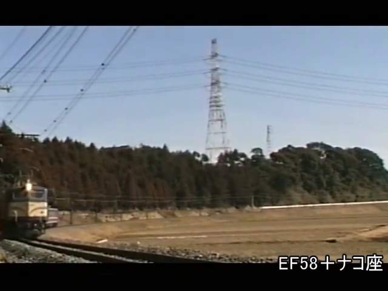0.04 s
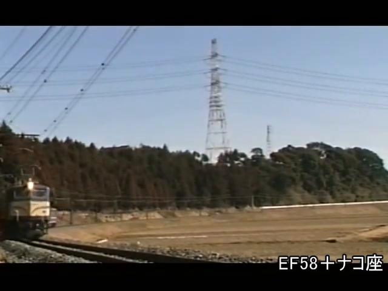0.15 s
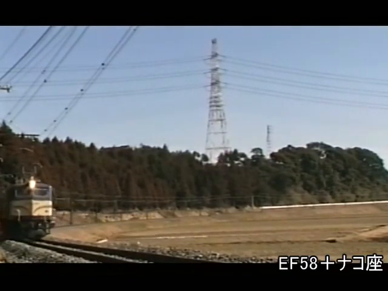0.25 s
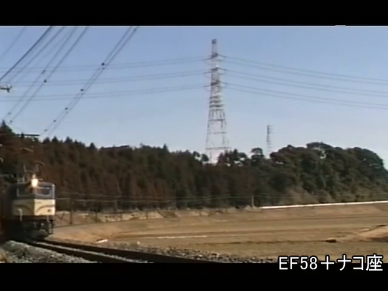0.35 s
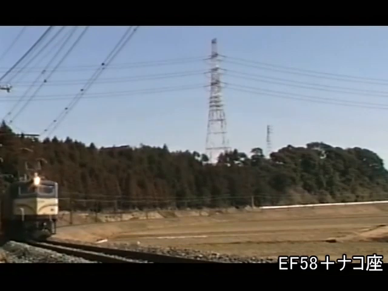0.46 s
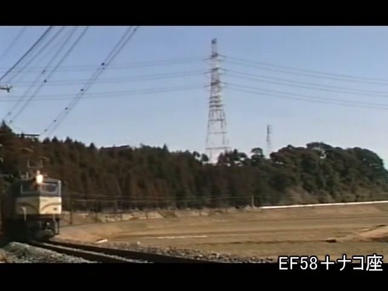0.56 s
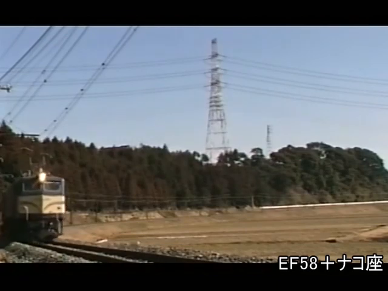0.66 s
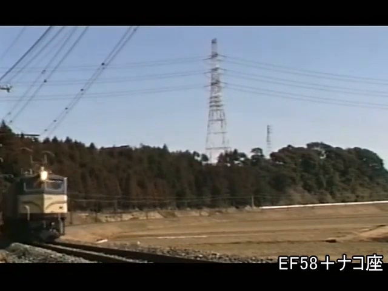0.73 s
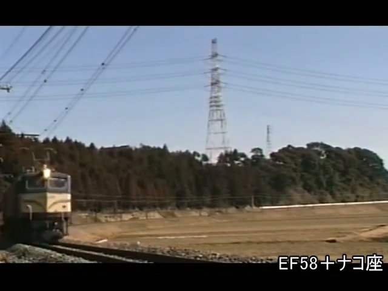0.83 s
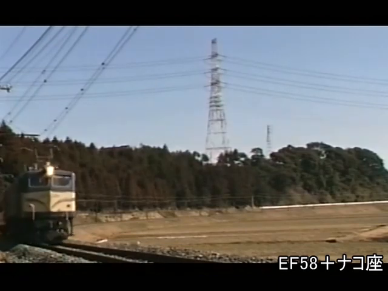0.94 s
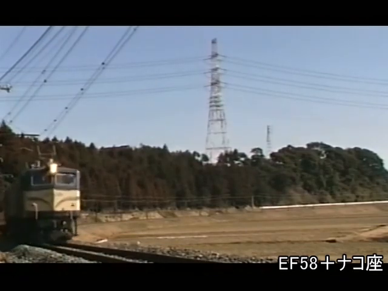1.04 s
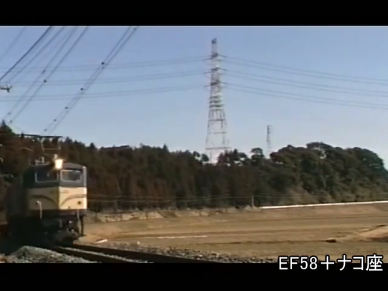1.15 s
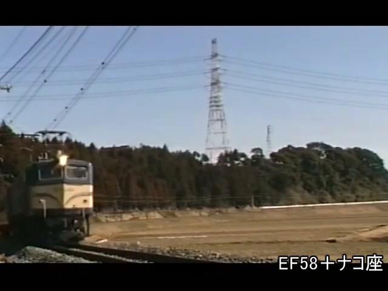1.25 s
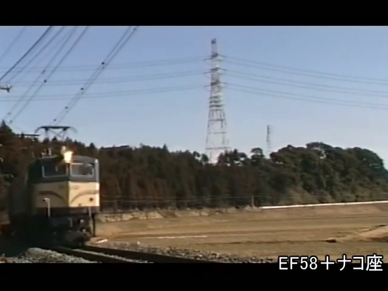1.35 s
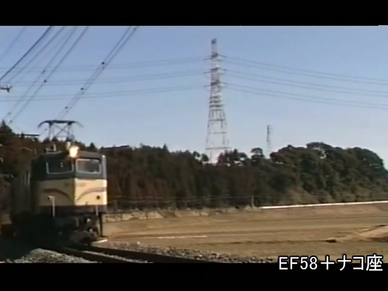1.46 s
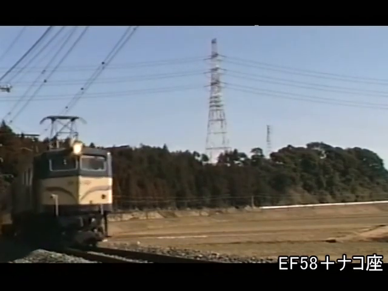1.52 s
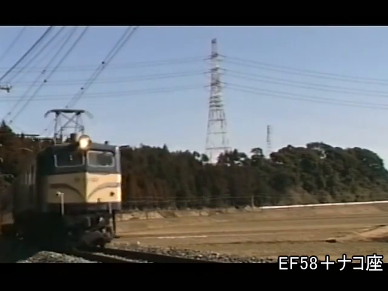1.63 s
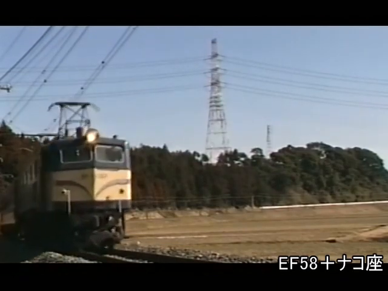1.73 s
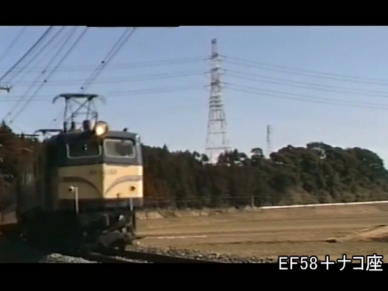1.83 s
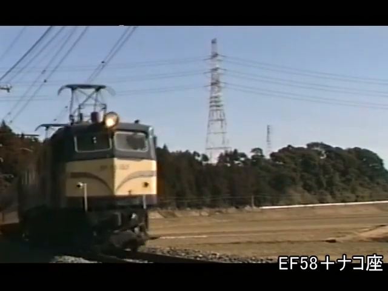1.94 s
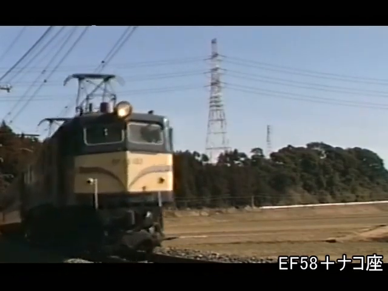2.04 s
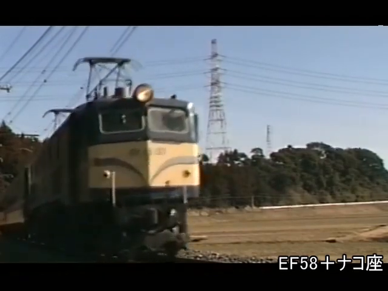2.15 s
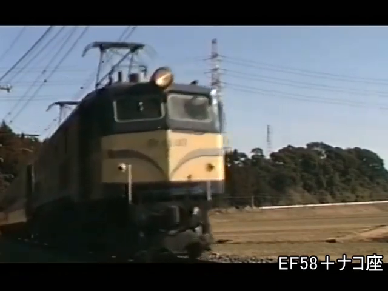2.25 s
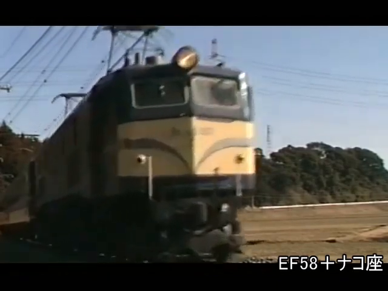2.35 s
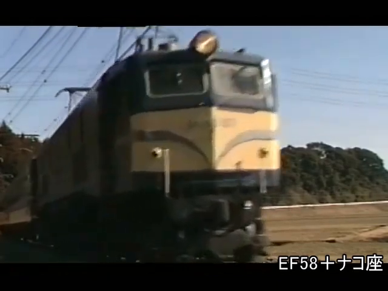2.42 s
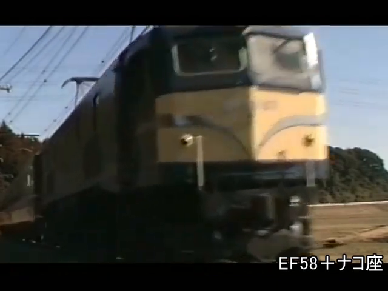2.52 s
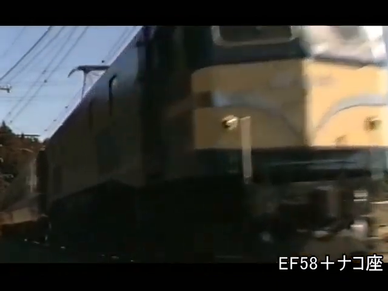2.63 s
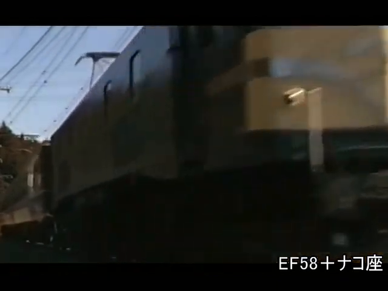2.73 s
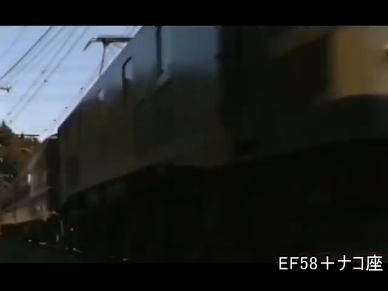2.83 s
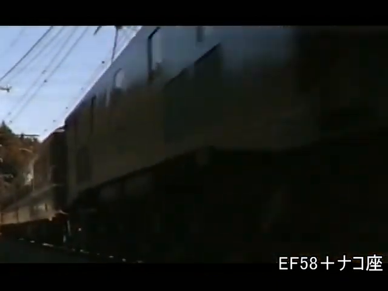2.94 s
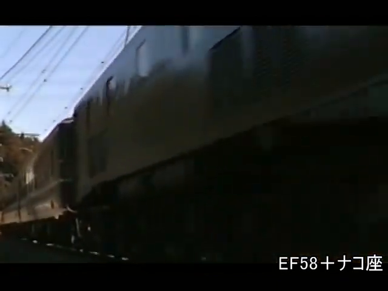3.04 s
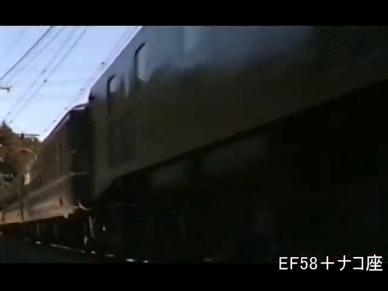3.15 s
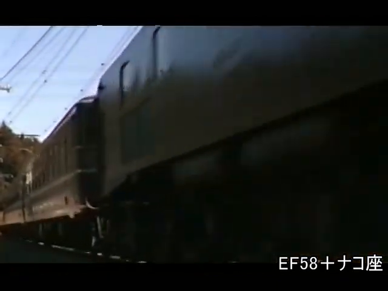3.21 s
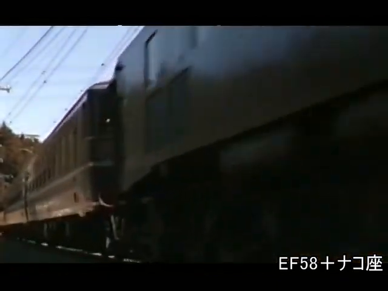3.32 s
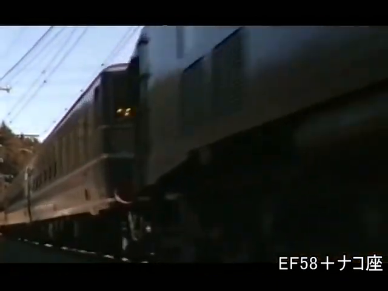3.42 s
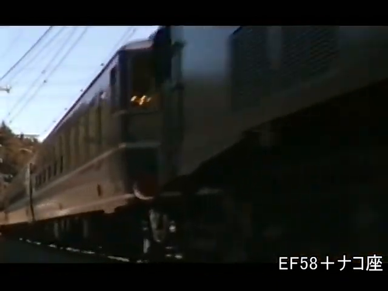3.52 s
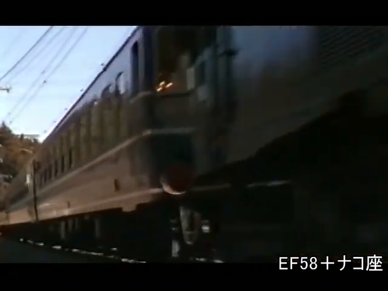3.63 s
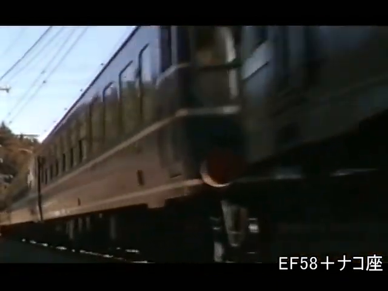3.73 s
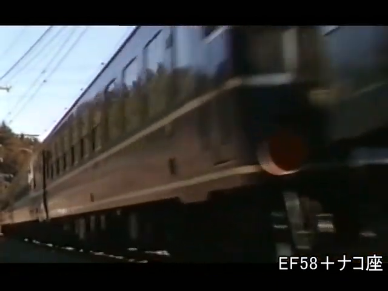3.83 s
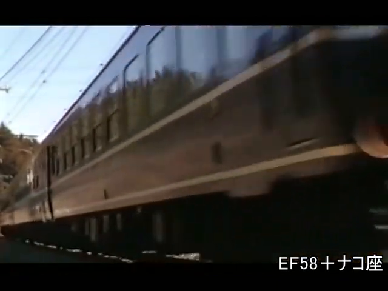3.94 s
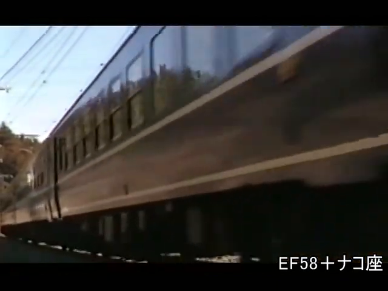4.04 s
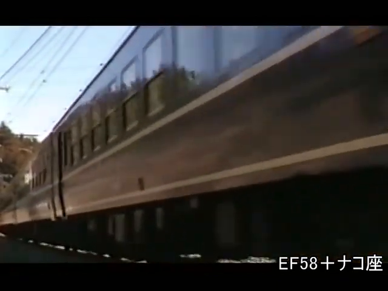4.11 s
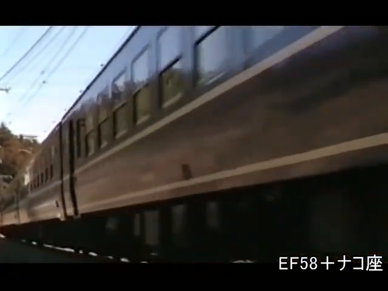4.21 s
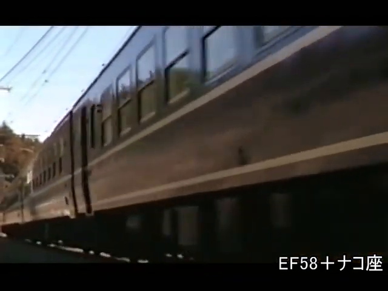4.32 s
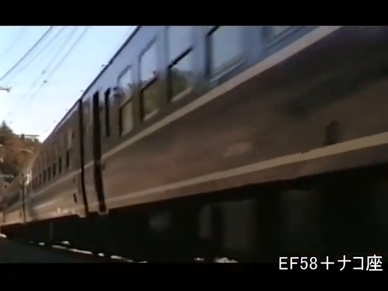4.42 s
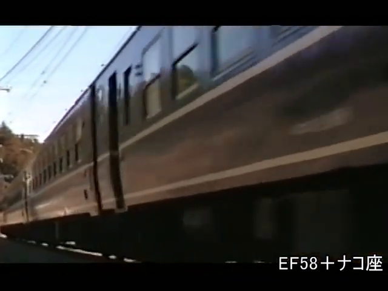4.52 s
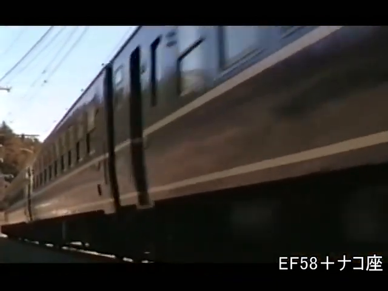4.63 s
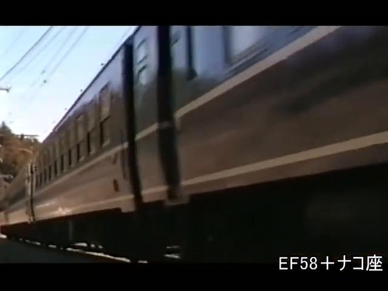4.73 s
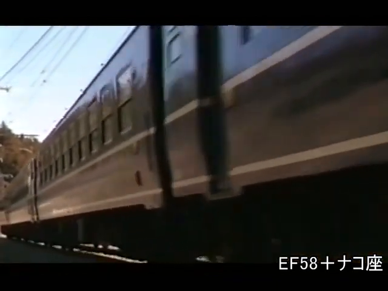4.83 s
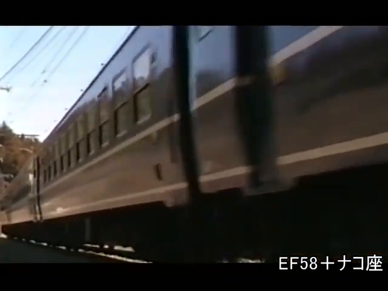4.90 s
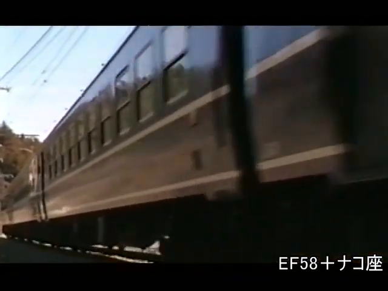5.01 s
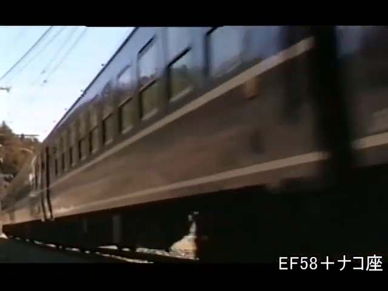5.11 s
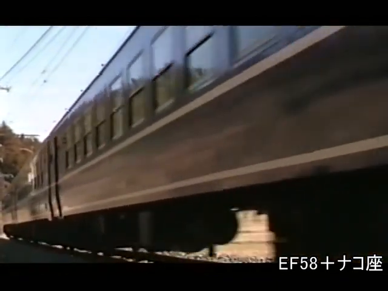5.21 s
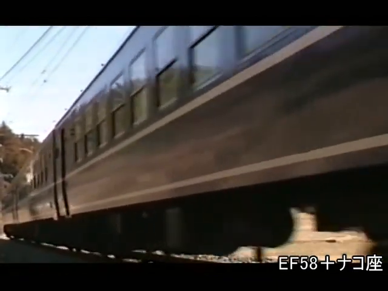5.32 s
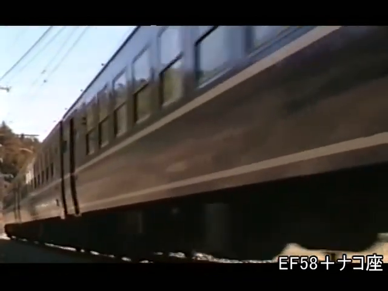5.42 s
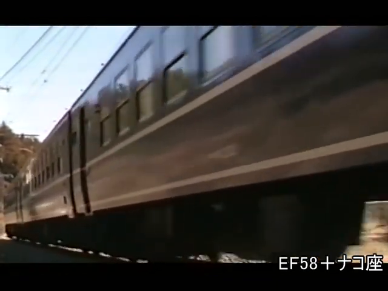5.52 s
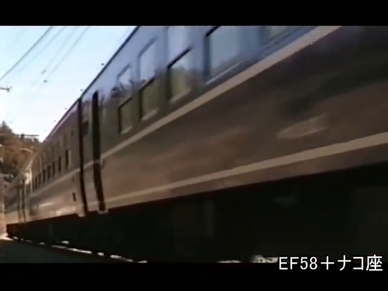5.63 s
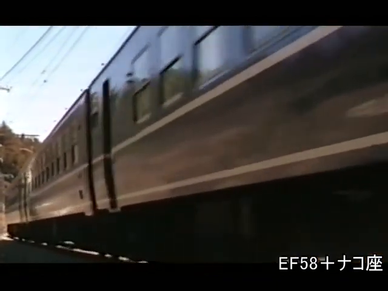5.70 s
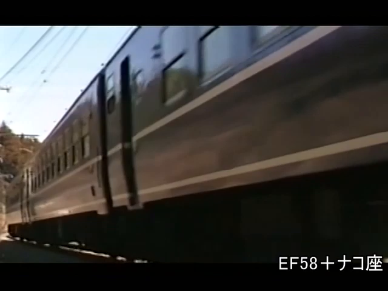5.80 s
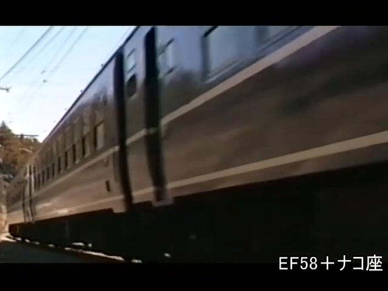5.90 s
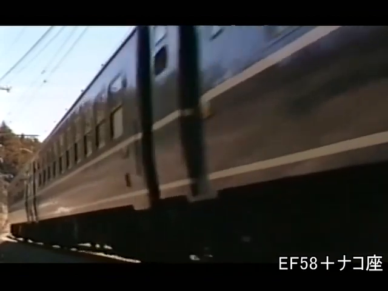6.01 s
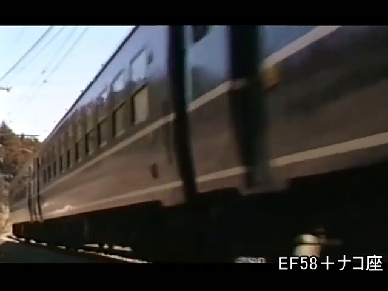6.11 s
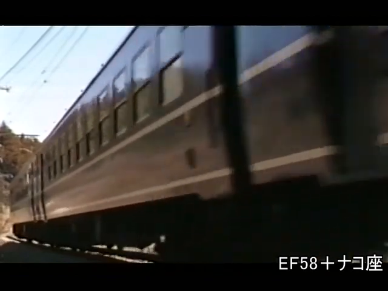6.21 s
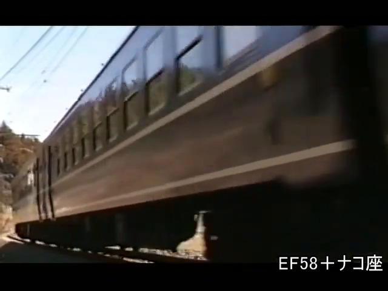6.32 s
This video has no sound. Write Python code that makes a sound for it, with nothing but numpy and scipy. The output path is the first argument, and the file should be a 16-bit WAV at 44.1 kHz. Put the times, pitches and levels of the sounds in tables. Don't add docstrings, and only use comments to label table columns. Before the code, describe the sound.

A small stereo microphone beside a curved country track picks up a train approaching: low ground rumble, soft hiss, gear whine and early clacks. Heavier blows arrive, then a broad roar peaks as the locomotive passes. It eases into steadier coach rolling, broken by dull axle knocks, bright joint clatter, ringing rims and short high flange squeals, still passing at the end.

```python
import sys
import numpy as np
from scipy import signal
from scipy.fft import rfft, irfft, next_fast_len
from scipy.io import wavfile
from scipy.ndimage import uniform_filter1d, map_coordinates

SR = 44100
rng = np.random.default_rng(int(sys.argv[2]) if len(sys.argv) > 2 else 0)


def ratio_of_db(decibels):
    return 10 ** (np.asarray(decibels, float) / 20)


def wrap_up_sound(samples):
    columns = np.atleast_2d(samples).T
    tamed = np.clip(columns, -1, 1)
    steps = np.round(tamed * 32767).astype(np.int16)
    wavfile.write(sys.argv[1], SR, steps)


N = 280476
T = np.arange(N) / SR
HZ = np.fft.rfftfreq(next_fast_len(N), 1 / SR) + 1e-3

# middle in seconds, length in seconds, heave in dB, flutter in dB.
GUSTS = [
    (0.31, 0.46, -69, -37),
    (3.667, .45, -47, -62),
    (5.5, 0.36, -66, -60),
    (6.09, 0.39, -57, -32.5),
]
# time in seconds, level in dB.
GROUND_LOAD = [(0, -56), (.3, -51.5), (1.5, -45), (2.1, -47.5), (2.6, -42), (3.3, -59), (4.05, -65),
               (4.4, -45), (5.1, -54), (5.75, -43), (6.36, -52)]
# start in seconds, level in dB, pitch in Hz.
KNOCKS = [(1.578, -36, 334), (1.708, -38, 392), (1.997, -30.5, 385), (2.469, -31, 323), (2.809, -24, 374),
          (3.249, -21, 385), (3.636, -24, 365), (3.688, -28, 340), (4.237, -34, 310), (4.299, -35, 191),
          (4.431, -27, 280), (4.549, -26, 258), (5.24, -27, 265), (5.356, -26.5, 271), (5.493, -24, 170),
          (5.609, -23, 255), (5.641, -29, 254), (5.752, -25.5, 236), (6.008, -26, 300), (6.319, -25, 285)]
# middle in seconds, length in seconds, pitch in Hz, level in dB.
SONGS = [(1.05, .1, 1290, -45), (1.47, .26, 1180, -45), (1.66, .12, 1150, -43), (1.48, .12, 345, -47),
         (2.1, .14, 1190, -40), (4.43, .1, 2620, -35), (4.58, .1, 1980, -37), (5.03, .04, 3200, -36),
         (5.03, .05, 2480, -36), (5.1, .08, 3150, -37), (5.125, .07, 2450, -28), (5.135, .06, 4680, -32),
         (5.21, .05, 4670, -37), (5.39, .22, 3340, -35), (5.42, .12, 2020, -33), (5.45, .14, 2540, -34),
         (5.455, .04, 460, -32), (5.5, .05, 1160, -30), (5.54, .04, 800, -28), (5.52, .08, 3820, -38),
         (5.6, .05, 1160, -27), (5.61, .04, 790, -28), (5.62, .1, 4660, -32), (5.64, .08, 3860, -36),
         (5.58, .05, 2570, -33), (5.65, .1, 2420, -33), (5.69, .06, 3070, -37), (6.25, .1, 1850, -31),
         (6.28, .1, 2500, -35)]
# start in seconds, level in dB, pitch in Hz.
PINGS = [(0.945, -21.5, 1094), (2.286, -14, 900), (2.386, -18, 935), (2.439, -18.5, 1050),
         (2.488, -17, 1215), (4.694, -16.5, 1060), (4.899, -20.5, 753), (4.98, -14, 848),
         (5.795, -17.5, 810), (5.894, -22.5, 703), (5.978, -26.5, 852), (6.189, -15.5, 854)]
# centre in Hz, width in Hz, level in dB.
GEAR_MODES = [(330, 20, -9), (374.6, 49, -11), (710, 11, -23), (1192.4, 39, 1), (1845, 46, -3),
              (1970, 24, -0.5)]
# centre in Hz, width in Hz, level in dB.
RIM_MODES = [(484, 42, -5.5), (822, 120, 1), (1169, 76, -1), (1904, 160, 0.5), (2480, 54, -4.5),
             (3300, 98, -7), (4070, 190, -5.5), (4650, 200, -7.5), (5260, 130, -8)]
# start in seconds, blow in dB, clank in Hz,
# thud over the blow in dB, tick over the blow in dB.
LOCO_JOINTS = [(1.0204, -24, 895, -9, -42), (1.12, -25.5, 1294, -13.5, -39),
               (1.2222, -31.5, 1077, -10, -37), (1.318, -43, 1240, -11, -32),
               (2.3083, -13, 1260, -7.5, -39), (2.4096, -16.5, 1150, -11, -44),
               (2.514, -15.5, 1160, -15, -33), (2.603, -22.5, 1048, -10.5, -24),
               (2.661, -34, 1160, -3, -20), (2.747, -24, 1264, -8, -27), (2.8589, -28.5, 1100, 5, -18)]
# start in seconds, blow in dB, clank in Hz,
# thud over the blow in dB, tick over the blow in dB.
COACH_JOINTS = [(4.1056, -31, 1140, -7, -15), (4.3664, -29.5, 786, -13, -12.5),
                (4.4661, -24, 710, -6.5, -17), (4.568, -24, 882, -13, -9), (4.6694, -21, 1104, -7.5, -12.5),
                (4.6974, -23, 1044, -13, -21), (4.8589, -17.5, 888, -19, -14),
                (4.9356, -26, 1306, -31, -27), (4.95, -22.5, 1355, -16, -23),
                (4.9706, -19.5, 836, -16.5, -13.5), (5.5764, -16.5, 1190, -21, -24),
                (5.667, -21, 802, -18, -15), (5.7808, -22, 820, -12, -11), (5.862, -30.5, 890, -15, -7),
                (5.8832, -19.5, 666, -8, -32), (5.974, -28, 866, -21, -9.5),
                (6.0661, -16.5, 716, -13.5, -13.5), (6.1294, -27, 1190, -28, -19),
                (6.18, -20, 862, -12.5, -11.5), (6.3394, -33.5, 856, -1, -8)]
# time in seconds, roar in dB, wheel discs over rail in dB,
# flange rub on the curve in dB.
ROLL = [(0.0, -47.5, -2.5, -1), (0.8, -43.5, -1, -0.5), (1.1, -42.5, 4, 4.5), (1.45, -41, 2.5, 1),
        (1.8, -37.5, 4, 2), (2.26, -34.5, 1.5, 2), (2.45, -26, -4, -3.5), (2.85, -19, -3, 0),
        (3.1, -22.5, 3, 1.5), (3.58, -28.5, 8.5, 5), (3.9, -27, 4, 0), (4.2, -30, 0, -5),
        (4.66, -28.5, -3, -6), (5.05, -32, 4, 1.5), (5.5, -26.5, 0.5, 4), (5.83, -27.5, -2, -2),
        (6.06, -28.5, 1, 2.5), (6.36, -31.5, 3.5, 5)]
# frequency in Hz, density in dB per Hz.
LOCO_SPECTRUM = [(24, -50), (40, -21), (122, -10), (375, 3.5), (411, -5), (519, 0), (687, 2.5), (952, 0.5),
                 (1170, 3.5), (2010, 5), (2530, -3.5), (5100, -10.5), (9790, -31), (10500, -43),
                 (13600, -74), (22000, -120)]
# frequency in Hz, density in dB per Hz.
COACH_SPECTRUM = [(24, -53), (40, -22), (80, -49), (125, -6.5), (270, -3), (570, 4.5), (1170, 5), (1520, 5),
                  (1960, 5), (4750, -5), (6290, -8.5), (10500, -30.5), (13600, -71), (22000, -120)]
PART_EDGES_HZ = [150, 500, 1400, 3000, 10000]
# level over the roar in dB under the locomotive, the same under the coaches,
# share of disc level (0-1), share of rub level (0-1).
PARTS = [
    (-9.5, -5, .01, .01),
    (-0.7, -5, 0.0033, .01),
    (0.87, -1.2, .99, .01),
    (-3, -3, .01, 0.96),
]
# frequency in Hz, shared power (0-1).
LIKENESS = [(100, 0.99), (300, 0.86), (1000, 0.75), (1800, 0.61), (3300, 0.6), (6000, 0.29), (10000, 0.02)]

HISS_DB = -66
DRAUGHT_DB, DRAUGHT_FLUTTER_DB = -39, -36.5
DRAUGHT_SHARE = 0.54
SHAKE_DB, SHAKE_T60_S = -20, 0.2
LOCO_DEEP_DB, COACH_DEEP_DB = -46, -37
SONG_DB, SONG_THROB_DB = 3, 3
PING_TICK_DB, PING_RATTLE_DB = -29.5, -8.5
GEARS_DB, GEARS_FAR_DB = -10, -12
GEARS_FROM_S, GEARS_TO_S, GEARS_FADE_S = 0.66, 4.1, 0.067
RIMS_DB, RIMS_FAR_DB, RIMS_FROM_S, RIMS_FADE_S = -8.5, -25, 4.69, 0.1
RUB_SINGS = 1.8
TICK_T60_S, TICK_HZ, TICK_WIDTH_HZ = 0.025, 8000, 5000
SKEW_S, SKEW_DB = 0.0053, -10
CLATTER_TOP_HZ = 6800
COUPLING_S, HANDOVER_S = 4.32, 0.31
ABEAM_S, SWING_S = 2.96, 0.2
PAN_AHEAD_DB, PAN_BEHIND_DB = 0, -8
LAG_AHEAD_SAMPLES, LAG_BEHIND_SAMPLES = -0.72, 3.15


def columns(table):
    s, *cols = np.transpose(table)
    return [np.interp(T, s, c) for c in cols]


def on_log(hz, table):
    f, v = np.transpose(table)
    return np.interp(np.log(hz), np.log(f), v)


def after(s, fade_s):
    return 1 / (1 + np.exp(-(T - s) / fade_s))


def walk(rate_hz):
    knots = rng.standard_normal(200)
    place = T * rate_hz
    k = place.astype(int)
    ease = (1 - np.cos(np.pi * (place - k))) / 2
    return knots[k] + ease * (knots[k + 1] - knots[k])


def shape(x, gain):
    return irfft(rfft(x, next_fast_len(N)) * gain, next_fast_len(N))[..., :N]


def peak(hz, width_hz):
    return 1 / (1 + 1j * (HZ - hz ** 2 / HZ) / width_hz)


def noise(gain, channels=3):
    used = np.abs(gain) > 1e-3 * np.abs(gain).max()
    lines = np.zeros((channels, len(HZ)), complex)
    lines[:, used] = rng.standard_normal((channels, len(HZ), 2))[:, used] @ [1, 1j] * gain[used]
    x = irfft(lines, next_fast_len(N))[:, :N]
    return x / x.std()


def blow(rise_s, t60_s, abrupt=1.34):
    age_s = T[:SR // 4]
    form = (1 - np.exp(-age_s / rise_s)) ** 2 * ratio_of_db(-60 * (age_s / t60_s) ** abrupt)
    return age_s, form / form.max()


def bursts(s, db, rise_s, t60_s):
    kicks = np.zeros(N)
    at = np.clip(((s - rise_s) * SR).astype(int), 0, N - 1)
    np.add.at(kicks, at, ratio_of_db(db))
    return signal.oaconvolve(kicks, blow(rise_s, t60_s)[1])[:N]


def rings(s, db, hz, rise_s, t60_s, partner=1.1, partner_db=-4):
    out = np.zeros(N + SR)
    age_s, form = blow(rise_s, t60_s)
    for start_s, level_db, f, turn in zip(s - rise_s, db, hz, rng.random((len(s), 2))):
        pair = np.sin(2 * np.pi * (f * age_s + turn[0]))
        pair += ratio_of_db(partner_db) * np.sin(2 * np.pi * (partner * f * age_s + turn[1]))
        at = int(start_s * SR)
        out[at:at + len(age_s)] += ratio_of_db(level_db) * form * pair
    return out[:N]


def hiss():
    return ratio_of_db(HISS_DB) * noise(peak(8000, 9000), channels=2)


def wind():
    drag_db = DRAUGHT_SHARE * columns(ROLL)[0]
    heave_size = ratio_of_db(DRAUGHT_DB + drag_db + 3.1 * walk(9))
    flutter_size = ratio_of_db(DRAUGHT_FLUTTER_DB + drag_db)
    for s, length_s, heave_db, flutter_db in GUSTS:
        swell = np.exp(-(2 * (T - s) / length_s) ** 4)
        heave_size = heave_size + ratio_of_db(heave_db) * swell
        flutter_size = flutter_size + ratio_of_db(flutter_db) * swell
    heave = heave_size * ratio_of_db(-0.5) * noise(peak(31, 25) ** 2)
    flutter = flutter_size * ratio_of_db(3.2 * walk(25)) * noise(peak(159, 170) ** 2)
    left = ratio_of_db(8.5) * heave[0] + ratio_of_db(2.0) * flutter[0]
    right = -ratio_of_db(2.0) * heave[0] - ratio_of_db(-2.5) * flutter[0]
    return np.array([left, right]) + 0.27 * heave[1:] + 0.14 * flutter[1:]


def ground():
    s, db, _, thud_db, _ = np.transpose(LOCO_JOINTS + COACH_JOINTS)
    load = ratio_of_db(columns(GROUND_LOAD)[0] + 5.1 * walk(11.0) - 7.0)
    load = load + bursts(s, db + thud_db + SHAKE_DB, 0.0054, SHAKE_T60_S)
    return load * noise(peak(99, 81) ** 2, channels=1)


def knocks():
    s, db, hz = np.transpose(KNOCKS)
    deep_db = np.where(s < GEARS_TO_S, LOCO_DEEP_DB, COACH_DEEP_DB)
    note = rings(s, db, hz, 0.0035, 0.063, partner=0.663, partner_db=-10.5)
    return note + rings(s, deep_db, 0.69 * hz, 0.013, 0.054)


def songs():
    out = np.zeros(N)
    waver_s = np.cumsum(1 + 0.011 * walk(28)) / SR
    throb = walk(30)
    for (s, length_s, hz, db), shift in zip(SONGS, rng.integers(0, N - SR, 64)):
        at = np.arange(int((s - length_s) * SR), min(int((s + length_s) * SR), N))
        own = at - at[0] + shift
        swell = np.exp(-(2 * (T[at] - s) / length_s) ** 4)
        level = ratio_of_db(db + SONG_DB + SONG_THROB_DB * throb[own])
        out[at] += level * swell * np.sin(2 * np.pi * hz * waver_s[own])
    return out


def pings():
    s, db, hz = np.transpose(PINGS)
    tick = bursts(s - 0.009, db + PING_TICK_DB, 0.0017, 0.034)
    out = tick * noise(peak(TICK_HZ, TICK_WIDTH_HZ) ** 2)
    rattle = bursts(s, db + PING_RATTLE_DB, 0.0067, 0.076)
    out += rattle * noise(peak(1090, 1300) ** 2)
    out[0] += rings(s, db, hz, 0.00204, 0.042, partner=1.15, partner_db=-29.5)
    return out


def ringing():
    roar_db, _, rub_db = columns(ROLL)
    gears_near = after(GEARS_FROM_S, GEARS_FADE_S) - after(GEARS_TO_S, GEARS_FADE_S)
    gears_db = GEARS_DB + GEARS_FAR_DB * (1 - gears_near)
    rims_near = after(RIMS_FROM_S, RIMS_FADE_S)
    rims_db = RIMS_DB - 2.5 + RUB_SINGS * rub_db + RIMS_FAR_DB * (1 - rims_near)
    out = 0
    for modes, db, patchy_db in ((GEAR_MODES, gears_db, 4.0), (RIM_MODES, rims_db, 5.0)):
        for hz, width_hz, mode_db in modes:
            level = ratio_of_db(roar_db + db + mode_db + patchy_db * walk(15))
            out = out + level * noise(peak(hz, 2 * width_hz) ** 2)
    return out


def joints(table, lag_s, body_hz, clatter_db, ring_db, clank_t60_s, clatter_t60_s, thud_t60_s):
    s, clank_db, hz, thud_db, tick_db = np.transpose(table)
    tick_db, clatter_db, thud_db = clank_db + tick_db, clank_db + clatter_db, clank_db + thud_db
    drop_s = s + lag_s

    tick = bursts(s, tick_db, 0.0015, TICK_T60_S)
    tick = tick + bursts(s + SKEW_S, tick_db + SKEW_DB, 0.001, TICK_T60_S)
    tick = tick * noise(peak(TICK_HZ, TICK_WIDTH_HZ) ** 2)

    top_cut = CLATTER_TOP_HZ ** 3 / np.hypot(CLATTER_TOP_HZ ** 3, HZ * HZ * HZ)
    clatter = bursts(s + lag_s / 2, clatter_db - 2.5, 0.0057, clatter_t60_s)
    clatter = clatter * noise(peak(1400, 3300) * peak(3360, 5300) * top_cut)

    clank = bursts(drop_s, clank_db - 4.0, 0.0055, 1.53 * clank_t60_s)
    clank = clank * noise(peak(body_hz, 1.14 * body_hz) ** 2 + 0.6 * peak(1835, 430) ** 2)
    clank[0] += rings(drop_s, clank_db + ring_db, hz, 0.0042, clank_t60_s)
    clank[0] += rings(drop_s + 0.012, clank_db + ring_db - 8.0, 0.91 * hz, 0.00466, clank_t60_s)

    thud = bursts(drop_s, thud_db + 0.5, 0.0049, 1.93 * thud_t60_s) * noise(peak(300, 360) ** 2)
    thud[0] += rings(drop_s, thud_db, 185 + 0 * s, 0.00544, thud_t60_s, partner=1.8, partner_db=-22.5)
    return tick + clatter + clank + thud


def rolling():
    centres_hz = 45 * 2 ** np.arange(0, 8, 1 / 3)
    spectra = (LOCO_SPECTRUM, COACH_SPECTRUM)
    colours_db = [on_log(centres_hz, t) + 10 * np.log10(centres_hz) for t in spectra]
    coaches = after(COUPLING_S, HANDOVER_S)
    roar_db, discs_db, rub_db = columns(ROLL)
    edges_hz = np.array(PART_EDGES_HZ)
    lift_db = []
    for (loco, coach, discs, rub), lo, hi in zip(PARTS, edges_hz, edges_hz[1:]):
        part_db = roar_db + loco + coaches * (coach - loco) + discs * discs_db + rub * rub_db
        inside = (centres_hz > lo) & (centres_hz < hi)
        share_db = [10 * np.log10(np.sum(ratio_of_db(2 * c[inside]))) for c in colours_db]
        lift_db.append(part_db - share_db[0] - coaches * (share_db[1] - share_db[0]))
    middles = np.log(np.sqrt(edges_hz[1:] * edges_hz[:-1]))
    slope = ratio_of_db((on_log(HZ, LOCO_SPECTRUM) + on_log(HZ, COACH_SPECTRUM)) / 2)
    shudder_db = 0.46 * walk(10.5)
    out = 0
    for hz, loco_db, coach_db in zip(centres_hz, *colours_db):
        weights = [np.interp(np.log(hz), middles, row) for row in np.eye(4)]
        db = loco_db + coaches * (coach_db - loco_db) + np.dot(weights, lift_db)
        db = db + shudder_db + 0.97 * walk(14)
        out = out + ratio_of_db(db) * noise(slope * np.exp(-(np.log2(HZ / hz) / 0.33) ** 2))
    return out


def at_ports(train):
    like = np.clip(on_log(HZ, LIKENESS), 0, 1)
    ports = shape(train[0], np.sqrt(like)) + shape(train[1:], np.sqrt(1 - like))
    behind = after(ABEAM_S, SWING_S)
    pan_db = PAN_AHEAD_DB + behind * (PAN_BEHIND_DB - PAN_AHEAD_DB)
    lag = LAG_AHEAD_SAMPLES + behind * (LAG_BEHIND_SAMPLES - LAG_AHEAD_SAMPLES)
    shaded = shape(ports, np.abs(peak(1870, 4200) * HZ / np.hypot(HZ, 350)))
    ports = ports + shaded * (ratio_of_db(np.array([pan_db, -pan_db]) / 2) - 1)
    ports[0] = map_coordinates(ports[0], [np.arange(N) - lag], order=3, mode="nearest")
    return ports


def scene():
    train = rolling() + ringing() + pings()
    train = train + joints(LOCO_JOINTS, lag_s=0.00098, body_hz=1180, clatter_db=-7.5, ring_db=-7.5,
                           clank_t60_s=0.083, clatter_t60_s=0.11, thud_t60_s=0.055)
    train = train + joints(COACH_JOINTS, lag_s=0.011, body_hz=810, clatter_db=-5, ring_db=-8.5,
                           clank_t60_s=0.063, clatter_t60_s=0.099, thud_t60_s=0.051)
    train[0] += songs() + knocks()
    return at_ports(train) + ground() + wind() + hiss()


def low_pass(x):
    return signal.sosfilt(signal.butter(12, 10480, fs=SR, output="sos"), x)


def record(dry):
    hold = np.exp(-1 / (0.09 * SR))
    heard = signal.lfilter([1 - hold], [1, -hold], np.mean(dry ** 2, axis=0))
    usual = uniform_filter1d(heard, SR // 4)
    ducked = dry * ((usual + 1e-9) / (heard + 1e-9)) ** 0.25
    cut = signal.sosfilt(signal.butter(16, 10450, fs=SR, output="sos"), ducked)
    soft = np.tanh(1.229 * cut) / 1.273
    return low_pass(soft)


dry = scene()
out = record(dry)
wrap_up_sound(out)
```